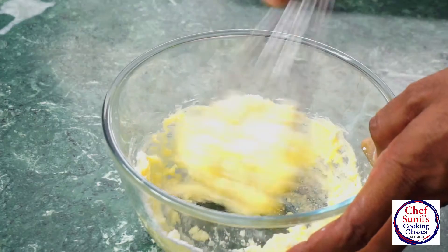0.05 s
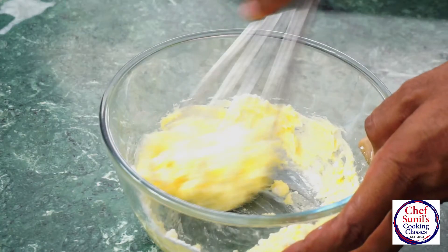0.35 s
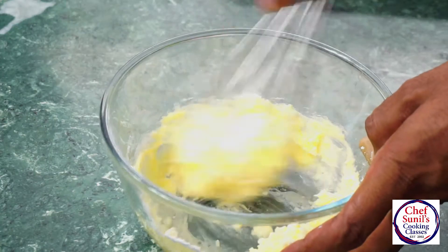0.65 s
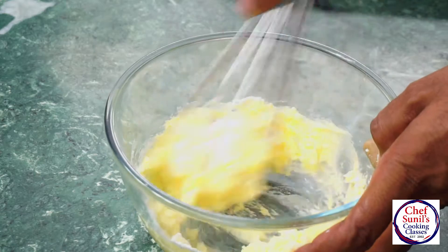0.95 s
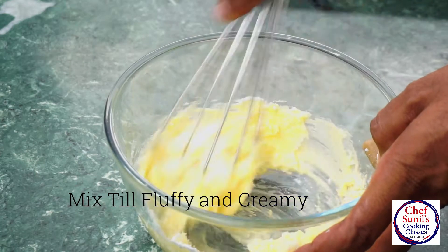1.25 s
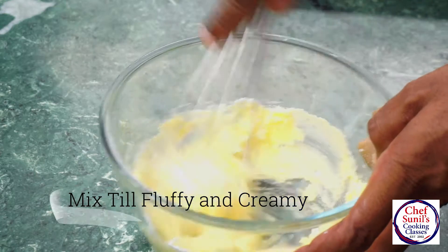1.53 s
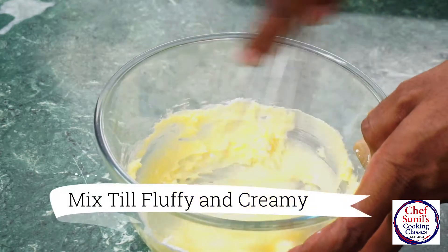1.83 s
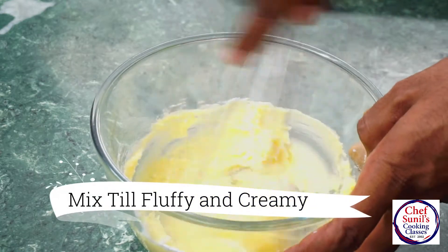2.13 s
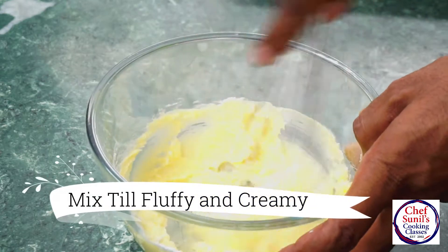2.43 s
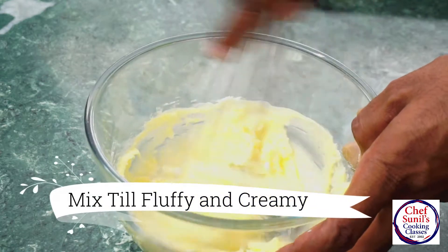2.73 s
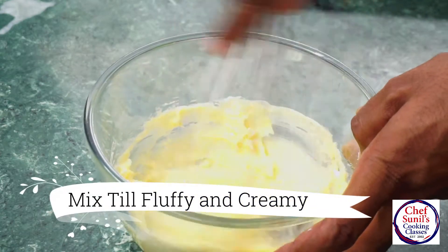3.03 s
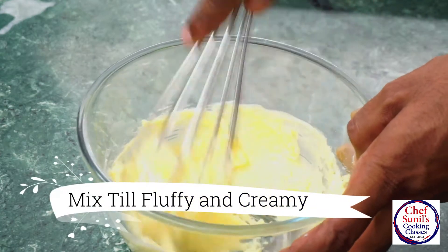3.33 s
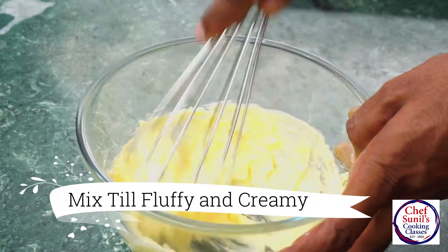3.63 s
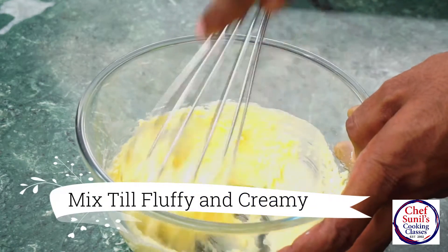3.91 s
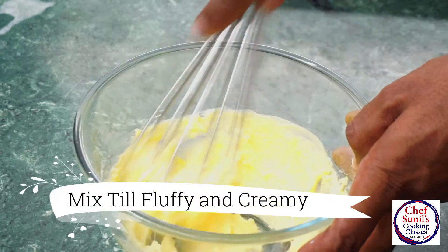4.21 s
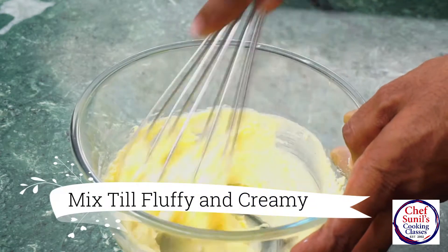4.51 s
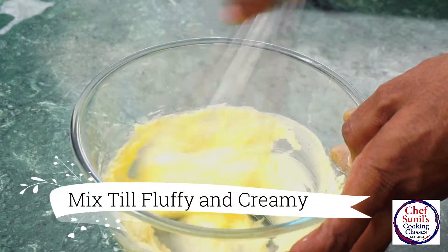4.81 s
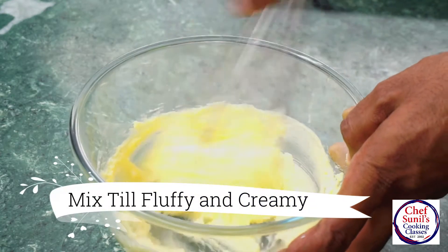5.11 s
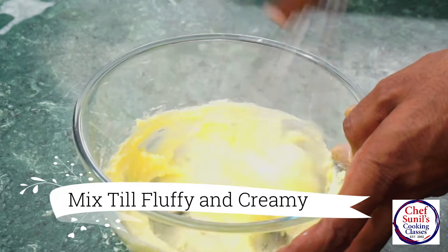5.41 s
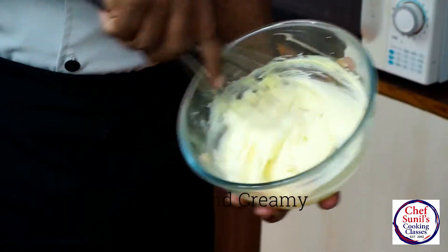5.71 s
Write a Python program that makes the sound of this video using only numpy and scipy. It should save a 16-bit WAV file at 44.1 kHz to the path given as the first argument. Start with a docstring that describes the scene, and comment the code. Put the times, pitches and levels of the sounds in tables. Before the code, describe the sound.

The first half second is silent. Then a faint clink and a gritty rub begin as a wire whisk creams butter and sugar in a glass bowl, heard close up. From about 0.6 to 5.1 seconds the strokes run quickly and evenly, roughly four to five a second, each with a push and a return. Sugar crunches brightly against the glass while butter squelches, with small wet pops and soft, low plops. The bowl rings faintly under the rubbing. Bare wires occasionally clink on the glass, most clearly at about 1.1 seconds and several times between 3.5 and 3.9 seconds. Around 5.2 seconds the whisking rests, leaving one faint clink. Gritty scraping resumes near 5.7 seconds with a couple more clinks. The hard-walled kitchen adds reverberation, and a quiet low hum lies underneath.

```python
"""A faint clink and a gritty rub, after half a second of silence: a wire whisk starts creaming butter
and sugar in a hand-held glass bowl. Each push and return crunches sugar by brittle fracture and tears
the butter, whose wet films snap and whose air pockets plop as cavity resonators. Now and then a bare
wire strikes the glass and excites its normal modes. The hard-walled kitchen reverberates over a low
hum; the hand rests briefly near the end."""
import sys
import numpy as np
from scipy import signal
from scipy.fft import rfft, irfft
from scipy.io import wavfile
from scipy.ndimage import uniform_filter1d

SR = 44100
rng = np.random.default_rng(int(sys.argv[2]) if len(sys.argv) > 2 else 0)


def int16_out(signal):
    """Quantize to a 16-bit WAV file."""
    q = np.round(np.clip(np.atleast_2d(signal).T, -1, 1) * 32767)
    wavfile.write(sys.argv[1], SR, q.astype(np.int16))


N = 258020


def amp(db):
    """Amplitude ratio of a level in decibels."""
    return 10 ** (np.asarray(db) / 20)


def unit_rms(x):
    """Normalisation to unit mean power."""
    return x / np.sqrt(np.mean(x ** 2) + 1e-20)


def curve_at(points, hz):
    """Interpolation on a logarithmic frequency axis."""
    f, value = np.transpose(points)
    return np.interp(np.log(hz + 1), np.log(f), value)


def add(mix, s, sound):
    """Superposition: a sound joins the mix at time s."""
    part = mix[round(s * SR):][:len(sound)]
    part += sound[:len(part)]


def colour(points, peak_hz=1000, peak_db=0, octaves=.2, size=2048):
    """Minimum-phase impulse response of unit energy, from a spectrum and one optional resonance."""
    hz = np.fft.rfftfreq(size, 1 / SR)
    peak = peak_db / (1 + (np.log2((hz + 1) / peak_hz) / octaves) ** 2)
    log_gain = np.log(amp(curve_at(points, hz) + peak))
    mirrored = np.r_[log_gain, log_gain[-2:0:-1]]
    taps = np.fft.ifft(np.exp(np.conj(signal.hilbert(mirrored)))).real
    return taps / np.linalg.norm(taps)


def grains(length, per_s, spread_db):
    """Shot noise: a Poisson train of clicks of uneven size, at unit rms."""
    chance, size, sign = rng.random((3, length))
    size_db = spread_db * np.minimum(-np.log(size + 1e-9), 3)
    return unit_rms((chance < per_s / SR) * amp(size_db) * np.sign(sign - .5))


def pulse(length_s, rise=0.28):
    """Exponential attack and slower relaxation: the pressure envelope of one contact."""
    u = np.arange(SR // 8) / SR / max(length_s, .002)
    shape = (1 - np.exp(-u / rise)) * np.exp(-u)
    return shape / shape.max()


def burst(envelope, tone, per_s, spread_db):
    """A transient of filtered shot noise, carrying the energy of its envelope."""
    x = signal.fftconvolve(envelope * grains(len(envelope), per_s, spread_db), tone)
    return x * np.linalg.norm(envelope) / (np.linalg.norm(x) + 1e-9)


# Spectrum of the room's background noise: f/Hz, level/dB
AIR_SPECTRUM = [(20, -45), (30, -24), (38, 8.5), (50, -17), (63, 5.5), (80, -11.5), (105, -4), (160, -9.5),
                (300, -6.5), (900, -13), (2000, -16.5), (6000, -28), (16000, -37)]
# Course of the low hum: t/s, level/dB
HUM_LEVEL = [(0.52, -80), (0.85, -46), (1.1, -47), (1.3, -54), (2.2, -46.5), (2.5, -58), (5.0, -56),
             (5.549, -49.5), (5.85, -72)]
# Stereo width of the diffuse field, side relative to mid: f/Hz, level/dB
DIFFUSE_WIDTH = [(100, -12.5), (270, -12.5), (520, -11.5), (1000, -3), (2000, -2), (5000, 1.5),
                 (15000, 2.5)]
def room_tone(air_db=-47, hum_db=-4, hum_hz=100, width_hz=12.7):
    """Broadband noise gives a soft rumble and hiss; narrow-band noise gives a wavering hum."""
    hz = np.fft.rfftfreq(N, 1 / SR)
    mid, side, drone = rfft(rng.standard_normal((3, N)))
    side = side * amp(curve_at(DIFFUSE_WIDTH, hz)) * hz / (hz + 80)
    air = unit_rms(irfft(np.array([mid + side, mid - side]) * amp(curve_at(AIR_SPECTRUM, hz)), N))
    hum = unit_rms(irfft(drone / (1 + ((hz - hum_hz) / width_hz) ** 2), N))
    course_db = np.interp(np.arange(N) / SR, *np.transpose(HUM_LEVEL))
    return amp(air_db) * air + amp(hum_db + course_db) * hum


# Reverberation time of the kitchen: f/Hz, T60/s
REVERB_TIME = [(200, 1), (700, 0.83), (2000, 0.66), (5000, 0.9), (10000, .55), (16000, 0.65)]
# Spectrum of its reverberant tail: f/Hz, level/dB
REVERB_LEVEL = [(200, 1.6), (1000, 0.22), (4000, 3.1), (14000, 3.9)]
def kitchen(x, gap_s=0.0024, build_s=0.0018):
    """Reverberation: dense, decaying reflections follow the direct sound, their bass alike in both ears."""
    count = SR // 8
    taps = np.zeros((2, count * 8))
    arrivals = np.arange(count) * 8 + rng.integers(0, 8, (2, count))
    np.put_along_axis(taps, arrivals, rng.choice([-1., 1.], arrivals.shape), 1)
    hz, t, tail = signal.stft(taps, SR, nperseg=256)
    decay = np.log(1000) / curve_at(REVERB_TIME, hz)[:, None]
    tail = tail * np.exp(-decay * t) * np.sqrt(2 * decay / count)
    tail *= amp(curve_at(REVERB_LEVEL, hz))[:, None]
    width = amp(curve_at(DIFFUSE_WIDTH, hz))[:, None]
    shares = np.array([np.ones_like(width), width]) / np.sqrt(1 + width ** 2)
    mid, side = signal.istft(tail * shares, SR, nperseg=256)[1]
    onset = np.clip((np.arange(len(mid)) / SR - gap_s) / build_s, 0, 1)
    reflections = onset * np.array([mid + side, mid - side])
    return x + signal.fftconvolve(x[None], reflections, axes=1)[:, :N]


# Steady rubbing between the strokes: t/s, sugar level/dB, butter level/dB
RUB_LEVEL = [(0.52, -39, -40), (0.7, -44.5, -43), (1.198, -40, -43.5), (1.9, -37.5, -42.5),
             (2.55, -42, -44), (3.3, -37, -42), (4.003, -39, -45.5), (4.5, -42, -42.5), (5.08, -43.5, -44),
             (5.25, -66, -70), (5.64, -53.5, -59), (5.7, -38.5, -44.5), (5.85, -29, -35.5)]
def rub(material, gain_db, tone, per_s, spread_db):
    """Sliding friction: many tiny contacts merge into continuous filtered shot noise."""
    times, sugar_db, butter_db = np.transpose(RUB_LEVEL)
    level_db = {"sugar": sugar_db, "butter": butter_db}[material] + gain_db
    envelope = amp(np.interp(np.arange(N) / SR, times, level_db))
    return signal.oaconvolve(envelope * grains(N, per_s, spread_db), tone)[:N]


# Normal modes of the glass bowl: f/Hz
MODE_HZ = [681, 792, 1000, 1647, 2964, 4604, 4650, 6570, 8807, 9275, 11400, 14205]
# Strength and decay of each mode: level/dB, T60/s at damping = 1
MODE_RING = [(-3.5, 0.3), (-6, 0.96), (-16.5, 0.38), (0, 0.093), (2, 0.1), (2.5, 0.059), (-2.5, 0.16),
             (-6, 0.047), (-5, 0.024), (-8, 0.32), (-3, 0.091), (1, 0.047)]
def bowl(weights_db, damping, phase_turns=0):
    """Modal response: the glass rings as a sum of decaying sinusoids; butter adds damping."""
    t = np.arange(SR // 3)[:, None] / SR
    db, t60 = np.transpose(MODE_RING)
    decay = np.log(1000) * damping / t60
    envelopes = amp(db + weights_db) * 2 * decay / SR * np.exp(-decay * t)
    return (envelopes * np.cos(2 * np.pi * (np.array(MODE_HZ) * t + phase_turns))).sum(1)


def singing_glass(level_db=-5, low_db=-3, wall_db=5, high_db=-9, damping=1.07):
    """Frictional excitation: dragging wires keep the bowl's modes humming between strokes."""
    weights_db = curve_at([(700, low_db), (1650, wall_db), (9000, high_db)], np.array(MODE_HZ))
    ring = bowl(weights_db, damping)
    return rub("butter", level_db, ring / np.linalg.norm(ring), per_s=300, spread_db=6.0)


# Weighting of the modes by a blow low on the wall, and by one at the rim: f/Hz, level/dB
WALL_BLOW = [(800, -9), (1650, 8), (2960, -2), (4600, 5.5), (6570, -14), (8800, 0), (9275, 15), (11400, 7),
             (14200, -6.5)]
RIM_BLOW = [(1650, -10), (2960, 6), (4600, 1), (6570, 9.5), (8800, 2.5), (9275, 5), (11400, -3),
            (14200, 0.5)]
# Spectrum of the whisk's loops chattering together: f/Hz, level/dB
WIRE_SPECTRUM = [(300, -20), (1600, -24), (3800, -4.5), (4650, 16.5), (5500, -3.5), (7500, -1.5),
                 (8400, 15), (9100, 16), (10000, 3.5), (11500, 7), (12800, 7.5), (14200, -5), (16000, -14)]
# Blows of bare wire on glass: t/s, level/dB, height (0 wall, 1 rim), tilt/(dB per octave)
CLINKS = [(0.517, -37, 0.35, 2), (0.612, -32, 0.32, 0), (0.744, -35, .4, 0), (0.978, -29.5, 0.81, -7.5),
          (1.114, -21, 0.43, 3.5), (2.355, -32.5, 0.37, -4.5), (3.466, -20, 0.066, 1.5),
          (3.699, -20.5, 0.3, 0.5), (3.72, -26, .1, -3), (3.909, -19, 0.63, 0), (4.837, -29.5, 0.85, -5),
          (5.025, -31.5, .5, 6), (5.379, -33.5, 0.92, -4.5), (5.756, -23, 0.88, 0.5),
          (5.795, -28.5, 1, -6.5)]
def clinks(ring_db=40, damping=0.7, pivot_hz=5000, rebound_s=.009, rebound_db=-6,
           tick_db=1, tick_s=0.0029, chatter_db=-9, chatter_s=0.019):
    """Impact: a wire ticks, chatters and rebounds once; the point struck sets which modes ring most."""
    out, mode_hz = np.zeros(N), np.array(MODE_HZ)
    wiry, hard = colour(WIRE_SPECTRUM), colour(CRUNCH_SPECTRUM)
    for s, db, height, tilt_db in CLINKS:
        height = np.clip(height, 0, 1)
        place_db = (1 - height) * curve_at(WALL_BLOW, mode_hz) + height * curve_at(RIM_BLOW, mode_hz)
        weights_db = place_db + tilt_db * np.log2(mode_hz / pivot_hz)
        for delay_s, blow_db in (0, db), (rebound_s, db + rebound_db):
            ring = bowl(weights_db, damping, phase_turns=rng.random(len(mode_hz)))
            add(out, s + delay_s, amp(blow_db + ring_db) * ring)
        tick = burst(pulse(tick_s, rise=.12), hard, per_s=8300, spread_db=3)
        add(out, s, height * amp(db + tick_db) * tick)  # less butter near the rim: a harder tick
        chatter = burst(pulse(chatter_s, rise=.12), wiry, per_s=9000, spread_db=4)
        add(out, s, amp(db + chatter_db) * chatter)
    return out


# Short low notes in the strokes, butter gulps and the bowl's lowest ring:
# t/s, level/dB, starting f/Hz, decay time/s
LOW_NOTES = [(0.964, -36, 1050, 0.013), (1.066, -41, 563, 0.018), (1.215, -30, 821, 0.025),
             (1.294, -32, 707, 0.03), (1.332, -43.5, 478, .03), (1.444, -29.5, 840, 0.027),
             (1.547, -33, 715, 0.018), (1.774, -28.5, 621, 0.023), (2.179, -33.5, 780, 0.017),
             (2.501, -32.5, 691, 0.026), (2.715, -31, 705, .02), (3.31, -34, 842, .014),
             (3.399, -36, 706, 0.027), (3.5, -33, 995, .015), (4.078, -33.5, 631, 0.017),
             (4.294, -41.5, 601, 0.1), (4.387, -28.5, 970, 0.01), (4.505, -32.5, 568, 0.047),
             (4.738, -36.5, 418.5, 0.042)]
def low_notes(level_db=-1, rough=0.6, flutter_hz=90, sink_octaves_per_s=8, reference_hz=565):
    """Damped oscillation: each gulp or low ring is a brief, rough tone that sinks in pitch."""
    out = np.zeros(N)
    for s, db, hz, decay_s in LOW_NOTES:
        glide = -sink_octaves_per_s * (reference_hz / hz) ** 2  # higher notes sink less
        envelope = pulse(decay_s, rise=0.1)
        t = np.arange(len(envelope)) / SR
        phase = 2 * np.pi * (np.cumsum(hz * 2 ** (glide * t)) / SR + rng.random())
        flutter = unit_rms(uniform_filter1d(rng.standard_normal(len(t)), int(SR / flutter_hz)))
        note = np.sin(phase) + rough * flutter * np.cos(phase)  # the tone quivers
        add(out, s, amp(db + level_db) * envelope * unit_rms(note))
    return out


# The sharpest pops of trapped air: t/s, level/dB
POPS = [(1.298, -26.5), (1.528, -20.5), (2.49, -37), (2.714, -29), (2.942, -42), (3.168, -21), (3.397, -25),
        (3.864, -26), (4.293, -23), (4.388, -27), (4.508, -22.5), (4.735, -32), (4.961, -27)]
def pops(length_s=0.002):
    """Sudden pressure release: a sealed pocket bursts with a short wet crack."""
    out, wet = np.zeros(N), colour(SQUELCH_SPECTRUM)
    for s, db in POPS:
        add(out, s, amp(db) * burst(pulse(length_s), wet, per_s=6000, spread_db=-1.5))
    return out


# Pushes into the butter, about 4.4 a second, and lighter returns along the glass:
# t/s, sugar level/dB, butter level/dB, lag of the trailing wires/s
PUSHES = [(0.591, -31, -29.5, 0.017), (0.818, -31, -31.5, 0.016), (1.051, -29, -30, 0.0092),
          (1.291, -24.5, -26, 0.0039), (1.517, -28.5, -29, 0.0098), (1.735, -31, -27.5, .008),
          (1.985, -32.5, -31.5, 0.0062), (2.212, -30.5, -30.5, 0.022), (2.484, -30.5, -30, .005),
          (2.708, -29, -27, 0.0069), (2.92, -29.5, -28, 0.014), (3.15, -28, -28.5, .013),
          (3.396, -31, -29, 0.0042), (3.618, -29.5, -28, .008), (3.85, -28, -26.5, 0.0068),
          (4.06, -30, -32, 0.013), (4.29, -27.5, -26.5, .004), (4.503, -24, -26.5, 0.0039),
          (4.72, -29, -28, .008), (4.957, -25, -26, 0.0054)]
RETURNS = [(0.533, -46, -38, .02), (0.703, -32, -36, 0.04), (0.948, -26.5, -32, 0.023),
           (1.174, -30, -30, 0.037), (1.402, -29.5, -31, 0.037), (1.635, -27.5, -32.5, .024),
           (1.859, -30, -31.5, 0.04), (2.106, -32, -35, 0.029), (2.352, -32, -35.5, 0.026),
           (2.592, -29.5, -33, .028), (2.819, -31.5, -34.5, 0.022), (3.044, -30, -37, 0.024),
           (3.275, -28, -32, 0.032), (3.5, -25.5, -29, 0.014), (3.736, -29, -31, 0.026),
           (3.975, -29, -34, .02), (4.176, -28, -29.5, .03), (4.385, -27.5, -31.5, 0.025),
           (4.588, -26.5, -34.5, .018), (4.833, -30, -32.5, 0.028), (5.061, -28, -32, .026),
           (5.66, -38, -42.5, 0.031), (5.719, -36, -45, 0.033)]
# Phases of a stroke, a row each for leading wires, trailing wires and butter slumping back:
# crunch level/dB, squelch level/dB, plop level/dB, decay time/s at the mean lag
PUSH_PHASES = [(0, -1.5, -11, 0.014), (-0.5, 0.5, -2.5, 0.019), (-4, -19.5, -7, 0.011)]
RETURN_PHASES = [(0.5, -2.5, -6.5, 0.019), (-1.5, -5, -0.5, 0.011), (-23.5, -12.5, -9.5, 0.0095)]
def stroke_phases(push_hz=677, return_hz=820, scatter_octaves=0.079, slump_s=.035, haste=0.33):
    """Successive excitation: three pulses a stroke; the deeper push opens larger, lower air pockets."""
    rows = []
    for strokes, phases, pocket_hz in (PUSHES, PUSH_PHASES, push_hz), (RETURNS, RETURN_PHASES, return_hz):
        mean_lag_s = np.mean(np.array(strokes)[:, 3])
        for s, sugar_db, butter_db, lag_s in strokes:
            stretch = abs(lag_s / mean_lag_s) ** haste  # a quick stroke has shorter phases
            delays_s = 0, lag_s, lag_s + slump_s
            for delay_s, (crunch_db, squelch_db, plop_db, decay_s) in zip(delays_s, phases):
                hz = pocket_hz * 2 ** (scatter_octaves * rng.standard_normal())
                levels_db = sugar_db + crunch_db, butter_db + squelch_db, butter_db + plop_db
                rows.append((s + delay_s, *levels_db, hz, stretch * decay_s))
    return rows


# Spectra of snapping wet films and of opening air pockets: f/Hz, level/dB
SQUELCH_SPECTRUM = [(150, -38), (700, -15), (1200, -11), (1500, 2), (1950, 0.5), (2400, 1), (3300, 0),
                    (4300, -6), (6000, -9.5), (15000, -28.5)]
PLOP_SPECTRUM = [(50, -30), (170, -12.5), (290, -2.5), (450, -2), (600, 1), (800, -1), (1000, 1),
                 (1250, -5), (2000, -23), (8000, -21)]
def butter(squelch_db=-2.0, plop_db=-1.0, rub_db=-5.0, churn_db=-6, resonance_db=7):
    """Film rupture and cavity resonance: wires snap wet films, and pockets plop at their own pitch."""
    wet = colour(SQUELCH_SPECTRUM)
    out = rub("butter", rub_db, wet, per_s=1000, spread_db=5.0)
    out += rub("butter", churn_db, colour(PLOP_SPECTRUM), per_s=600, spread_db=6.0)
    for s, _, wet_db, air_db, hz, decay_s in stroke_phases():
        pressure = pulse(decay_s)
        pocket = colour(PLOP_SPECTRUM, hz, resonance_db, octaves=0.094)
        add(out, s, amp(wet_db + squelch_db) * burst(pressure, wet, per_s=3000, spread_db=2.0))
        add(out, s, amp(air_db + plop_db) * burst(pressure, pocket, per_s=1400, spread_db=1.5))
    return out


# Spectrum of hard contact on glass: f/Hz, level/dB
CRUNCH_SPECTRUM = [(200, -27), (1200, -41), (2600, -10), (4200, 1), (5500, 3), (7400, 1.5), (8700, 6.5),
                   (10000, 3.5), (12500, 4.5), (14500, 0), (16000, 4)]
def sugar(crunch_db=0.33, rub_db=-1.1):
    """Brittle fracture: crystals crack between wire and glass, in bursts over a steady rub."""
    hard = colour(CRUNCH_SPECTRUM)
    out = rub("sugar", rub_db, hard, per_s=2700, spread_db=9.5)
    for s, db, *_, decay_s in stroke_phases():
        crunch = burst(pulse(decay_s, rise=0.099), hard, per_s=7000, spread_db=3.5)
        add(out, s, amp(db + crunch_db) * crunch)
    return out


def scene(ring_db=7.5, tilt_db_per_octave=-2.5, damping=2.23, glass_db=2.5, dry_ring_db=-10, left_db=-.5):
    """Forced vibration: sugar and butter softly drive the bowl's low modes; all sums in the kitchen."""
    mixing = sugar() + butter() + pops()
    octaves = np.log2(np.array(MODE_HZ) / MODE_HZ[0])
    damped_bowl = bowl(ring_db + tilt_db_per_octave * octaves, damping)
    mixing = mixing + signal.oaconvolve(mixing, damped_bowl)[:N]
    glass = singing_glass() + clinks()
    heard = kitchen(mixing + low_notes() + amp(glass_db) * glass)
    heard += amp(dry_ring_db) * glass  # some of the ring is added dry, keeping its notes clear and even
    return heard * amp([[left_db], [0]]) + room_tone()


def record(dry, start_s=0.513, cutoff_hz=15950):
    """Gating and band limiting: the sound cuts in after silence and passes a steep low-pass filter."""
    gate = np.clip((np.arange(N) / SR - start_s) / .002, 0, 1)
    low_pass = signal.firwin(511, cutoff_hz, window=("kaiser", 9), fs=SR)
    return signal.oaconvolve(dry * gate, low_pass[None], "same")


dry = scene()
out = record(dry)
int16_out(out)
```